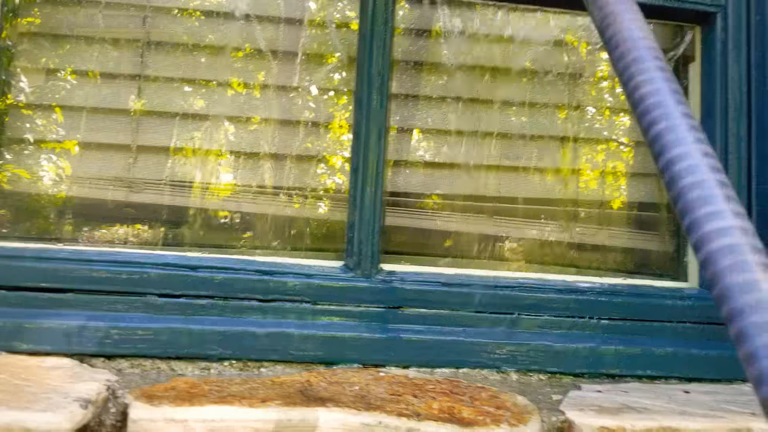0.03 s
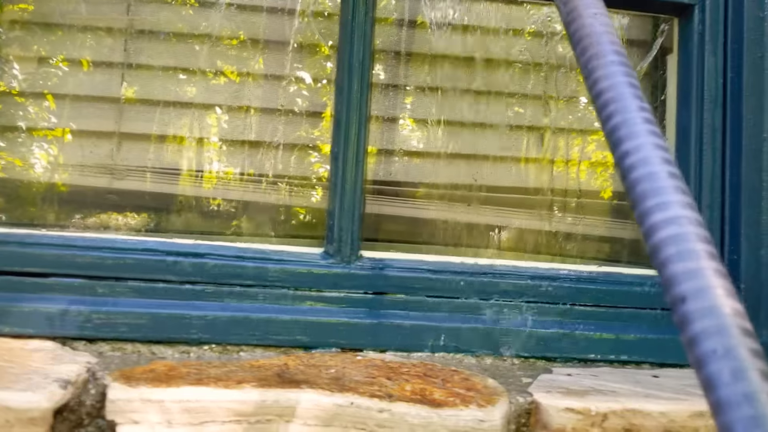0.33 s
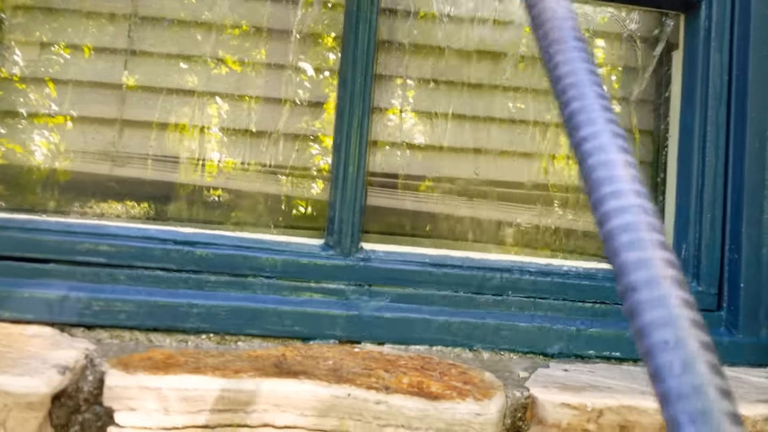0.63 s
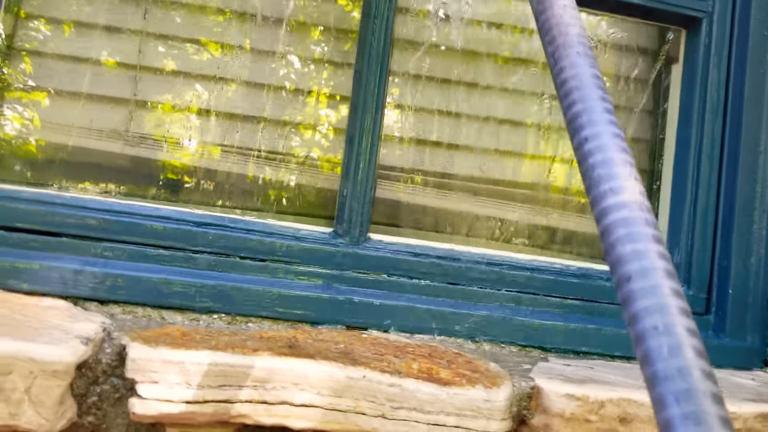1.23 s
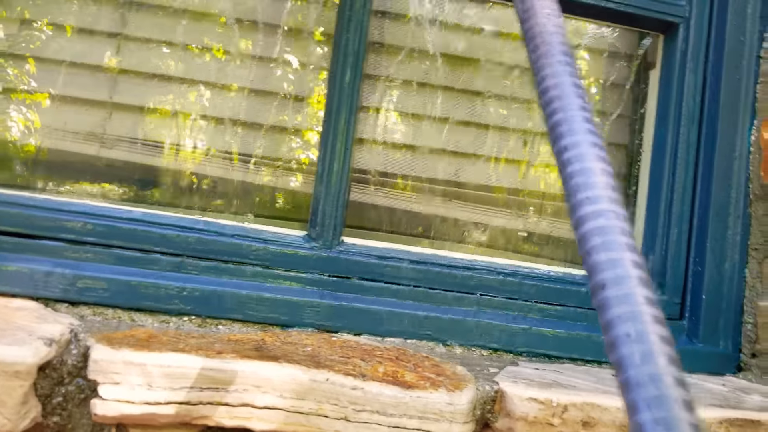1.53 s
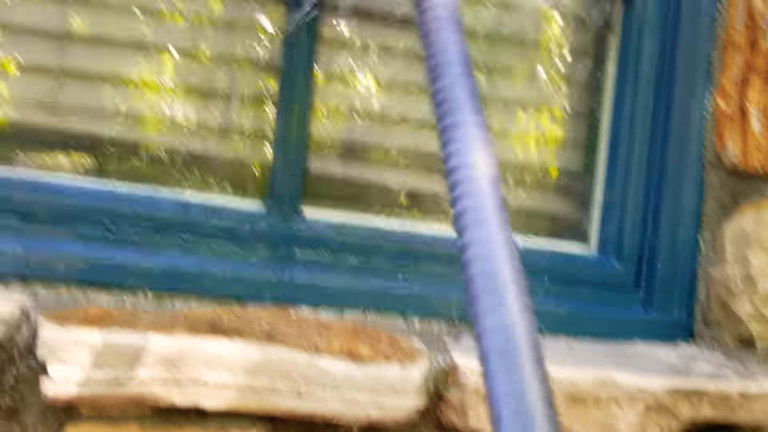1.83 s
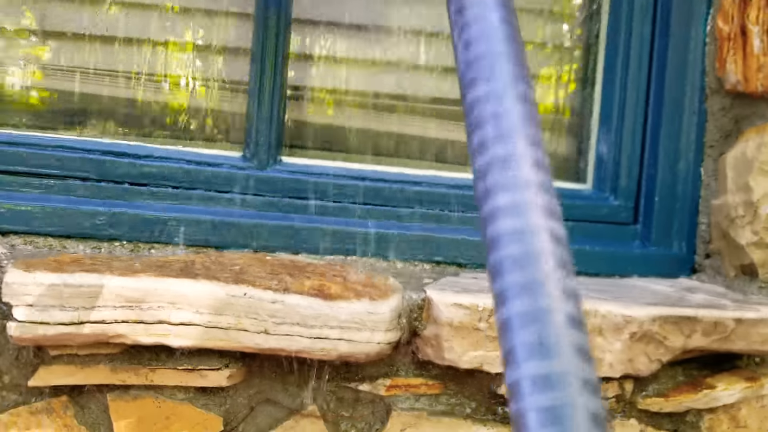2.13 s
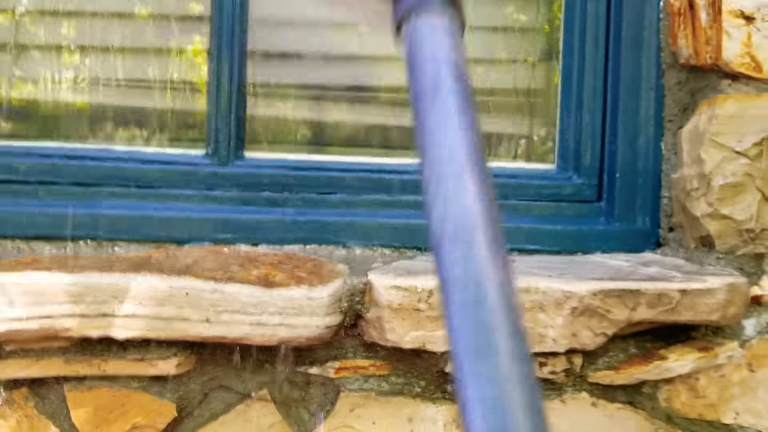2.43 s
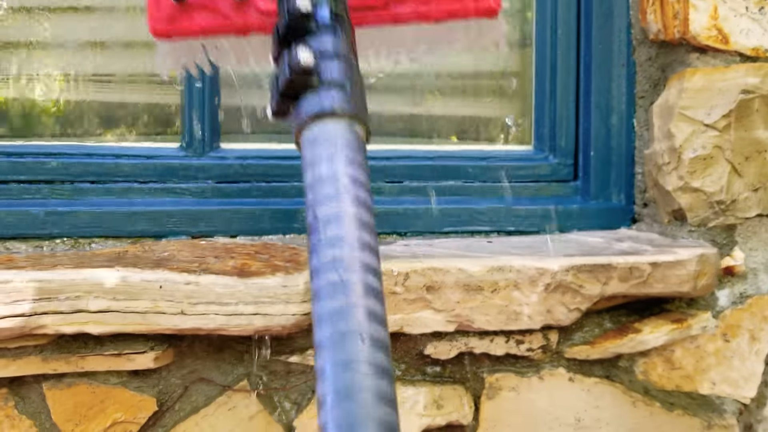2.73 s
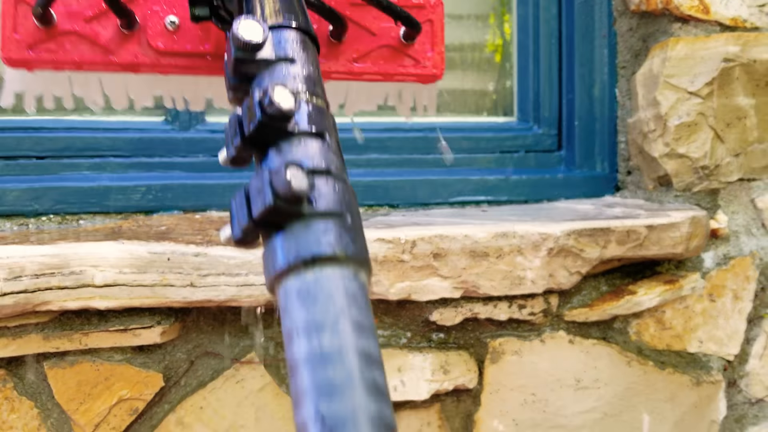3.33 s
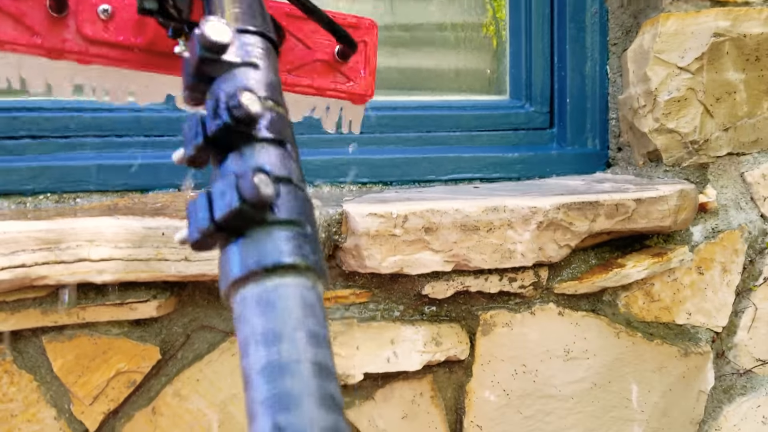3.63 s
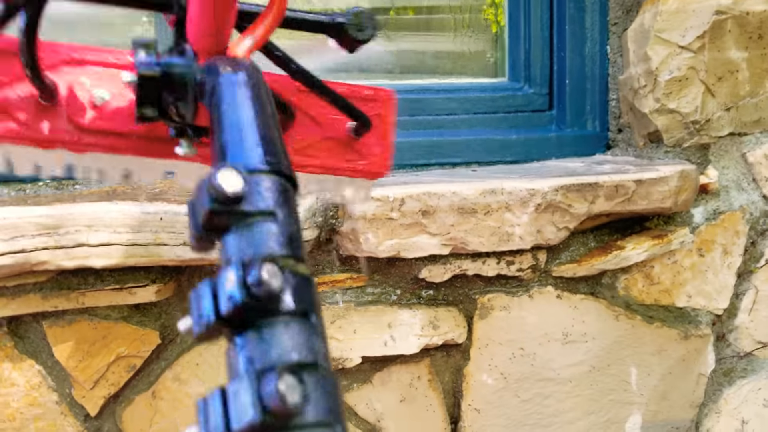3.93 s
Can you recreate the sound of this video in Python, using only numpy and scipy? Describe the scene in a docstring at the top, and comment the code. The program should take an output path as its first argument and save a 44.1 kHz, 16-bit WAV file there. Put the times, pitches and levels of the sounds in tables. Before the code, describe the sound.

Fine water spray patters on a window close by, with runoff splashing and stray drops ticking. From about 1.6 seconds wet bristles scrub the glass in short, hissing strokes until the end, the spray softening after 2 seconds. The pole's clamps click sharply near 1.2, 2, 3.3 and 3.5 seconds. Underneath are soft handling thumps, a low outdoor rumble and a distant engine that rises in pitch, loudest around 3 seconds.

```python
"""Outdoors at a window, a water-fed brush on a telescopic pole washes the glass.
Jets of water patter on the pane and make it ring, then wet bristles scrub it in short strokes
while water runs off. The pole's clamps knock, the brush head bumps the frame and stray drops tick,
all with a brief echo from the wall. Underneath lie soft handling thumps, a low rumble
and a distant engine that slows, then picks up speed near the end."""
import sys
import numpy as np
from scipy import signal
from scipy.fft import rfft, irfft
from scipy.io import wavfile

SR = 44100
rng = np.random.default_rng(int(sys.argv[2]) if len(sys.argv) > 2 else 0)


def master(y):
    """Save y as 16-bit WAV."""
    cut = np.clip(np.atleast_2d(y).T, -1, 1)
    pcm = np.round(cut * 32767)  # scale
    wavfile.write(sys.argv[1], SR, pcm.astype(np.int16))


N = 176400
T = np.arange(N) / SR
PER_HZ = np.sqrt(SR / 2)   # lifts white noise of power 1 to power 1 in every hertz


def brush():
    """Bristles flick over wet glass and ring their block; strokes swell and fade with the head's speed."""
    # strokes: start/s, length/s, level/dB, extra hiss/dB, left minus right/dB
    strokes = [(1.63, 0.26, -2, 4.5, -2.5), (1.903, 0.16, -3.5, 2.5, 1), (2.219, .32, 1, 4, -3),
               (2.728, 0.18, -7, 2.5, 0), (3.041, .29, 1, 6.5, -4), (3.327, 0.12, -7, -2, 0),
               (3.54, 0.24, -4.5, 5, 1), (3.685, 0.17, -5, 6.5, -0.5), (3.848, 0.22, -2.5, 5.5, 0.5)]
    # tone of the bristles: f/Hz, left/dB per Hz, right/dB per Hz
    bristle_tone = [(700, -83.5, -95.5), (1390, -81.5, -81.5), (2230, -70.5, -86), (3930, -70.5, -71.0),
                    (6300, -80.5, -74), (7500, -75.5, -75), (8900, -70, -81), (10300, -74.5, -83.5),
                    (11430, -63.5, -76.5), (12600, -65, -84), (14200, -67.5, -82), (15400, -70.5, -78.0)]
    body_power, hiss_power = np.zeros((2, N)), np.zeros((2, N))
    for start, length, db, hiss_db, pan_db in strokes:
        progress = np.clip((T - start) / length, 0, 1)
        speed = np.abs(np.sin(np.pi * progress)) ** 1.52
        body_power += (speed * from_db(db) * pan(pan_db)) ** 2
        hiss_power += (speed * from_db(db + hiss_db) * pan(pan_db)) ** 2
    contacts = grains(per_s=14000, spread_db=1.5)
    block = from_db(-83.5) * PER_HZ * resonate(contacts, hz=3950, width_hz=540)
    flicks = colour(contacts, bristle_tone) + block
    hiss = signal.sosfiltfilt(signal.butter(2, 10000, "high", fs=SR, output="sos"), flicks)
    scrub = (flicks - hiss) * np.sqrt(body_power) + hiss * np.sqrt(hiss_power)
    return scrub * waver(rate_hz=30, spread_db=1.25)   # uneven drag


def jets():
    """Fine, sputtering spray hits the pane and makes it ring."""
    # tone of spray on glass: f/Hz, left/dB per Hz, right/dB per Hz
    spray_tone = [(610, -97.5, -94), (1100, -87.5, -89), (1900, -78, -85.5), (2310, -82.5, -89),
                  (3860, -80, -79.5), (4960, -88.0, -82), (6600, -83, -81.5), (7630, -79.5, -80.5),
                  (9300, -82, -85.5), (11440, -73.0, -80.5), (12800, -77, -79.5), (15200, -75.5, -79.5)]
    # strength of the spray: t/s, level/dB
    spray_level = [(0, -3), (.7, -2), (1.25, 0), (1.65, -1), (2.05, -1), (2.17, -6.5), (2.55, -5),
                   (2.66, -11.5), (3.0, -6.5), (3.5, -5), (4, -4)]
    # notes the pane rings at: f/Hz, width/Hz, level/dB per Hz
    pane_notes = [(1142, 100, -78), (2000, 320, -80), (3980, 180, -82.5), (7970, 380, -83),
                  (11300, 600, -81)]
    drops_per_s, spread_db = 9000, 3
    spray_db, = in_time(spray_level)
    impacts = grains(drops_per_s, spread_db) * PER_HZ
    pane = sum(from_db(db) * resonate(impacts, hz, width_hz) for hz, width_hz, db in pane_notes)
    patter = colour(grains(drops_per_s, spread_db), spray_tone)
    return (patter + pane * pan(db=4)) * from_db(spray_db) * waver(rate_hz=21, spread_db=0.97)


def runoff():
    """Water runs off the frame and sill in coarser splashes."""
    # tone of the splashes: f/Hz, left/dB per Hz, right/dB per Hz
    splash_tone = [(200, -100, -100), (600, -93.5, -86), (1100, -84.5, -83), (1600, -79, -84),
                   (2540, -79, -83), (3480, -82, -83), (5200, -90.5, -86.5), (8000, -91, -90.5),
                   (15000, -85, -104)]
    # strength of the flow: t/s, level/dB
    flow_level = [(0, 0.5), (1.5, -3), (2.0, -0.5), (2.35, 6.5), (2.55, 2), (2.72, 3.5), (3.0, 0.5),
                  (3.3, 2), (4, -2.5)]
    flow_db, = in_time(flow_level)
    return colour(grains(per_s=3500, spread_db=2), splash_tone) * from_db(flow_db)


def knocks():
    """A crack, a rattle and a rebound ring the clamps; where the pole is hit sets which notes stand out."""
    # knocks: t/s, level/dB, centre of the strongest notes/Hz, their spread/octaves, left minus right/dB
    hits = [(.9595, -27, 4000, .8, -3), (1.2238, -10.5, 2930, 0.55, 1.5), (1.963, -15, 2200, 0.84, 2),
            (2.2435, -20.5, 7000, .9, 3), (3.2728, -12, 8570, 0.72, 2), (3.4724, -7, 7500, 2.25, 2)]
    # notes the clamps ring at: f/Hz, width/Hz, level/dB
    clamp_notes = [(2410, 500, -2.5), (3570, 680, -0.5), (4350, 320, 2.5), (4680, 250, 4), (5224, 270, 4),
                   (7500, 500, 0), (9600, 550, -3.5), (12400, 500, 4), (14530, 800, -6)]
    crack_s, rebound_delay_s, crack_db, ring_db = 0.0011, 0.003, -8.5, 5.5
    out, length = np.zeros((2, N)), SR // 10
    for s, db, centre_hz, octaves, pan_db in hits:
        crack = burst(length, crack_s)
        rattle = from_db(-15.5) * burst(length, decay_s=0.0087)
        rebound = from_db(-6.5) * np.roll(burst(length, crack_s), int(rebound_delay_s * SR), axis=1)
        contact = crack + rattle + rebound
        knock = from_db(crack_db) * contact
        for k, (hz, width_hz, note_db) in enumerate(clamp_notes):
            weight = np.exp(-.5 * (np.log2(hz / centre_hz) / octaves) ** 2)
            knock += (-1) ** k * weight * from_db(ring_db + note_db) * resonate(contact, hz, width_hz)
        add(out, s, knock * from_db(db) * pan(pan_db))
    return signal.sosfilt(signal.butter(2, 1700, "high", fs=SR, output="sos"), out)


def ticks():
    """Single drops and snapping bristles ping briefly, with a little spatter after them."""
    # pings: t/s, level/dB, f/Hz, time to fade by 60 dB/s, left minus right/dB
    pings = [(0.257, -14.5, 14500, .0012, 3), (.258, -20, 9800, 0.0018, -2), (0.696, -23, 15000, .002, -1),
             (1.18, -21, 12000, .002, 6), (1.204, -21.5, 6700, 0.0017, -5),
             (1.3145, -24, 11100, 0.0027, 11), (1.538, -26, 9600, .003, 4), (2.0655, -25, 9250, .005, 10),
             (2.1015, -28, 9000, .005, 7), (2.112, -30, 5800, .002, -5), (2.118, -22, 12000, .001, 2),
             (2.725, -26, 13100, .002, 5), (2.9319, -29, 13300, .003, 7), (2.983, -26.5, 12500, .003, 14),
             (3.14, -13.5, 13500, .003, 14), (3.412, -26, 13000, .002, 11)]
    out, length = np.zeros((2, N)), SR // 20
    for s, db, hz, fade_s, pan_db in pings:
        spatter = from_db(-15) * burst(length, decay_s=.003)
        ping = ring(click(0)[:length] + spatter, hz, fade_s)
        add(out, s, ping / np.abs(ping).max() * from_db(db) * pan(pan_db))
    return out


def plop():
    """One fat drop lands on the sill."""
    # notes of the plop: f/Hz, level/dB, time to fade by 60 dB/s
    notes = [(565, 1, 0.022), (700, 3, 0.012), (885, -3.5, 0.017)]
    drop = from_db(-25.5) * click(s=2.0862)
    return sum((-1) ** k * from_db(db) * ring(drop, hz, fade_s) for k, (hz, db, fade_s) in enumerate(notes))


def bumps():
    """The padded brush head nudges the frame with a dull scuff."""
    # nudges: t/s, level/dB, top of the sound's range/Hz, decay time/s
    nudges = [(.385, -46, 1300, 0.023), (1.586, -45.5, 1600, 0.0052), (1.733, -41, 1200, .008),
              (1.747, -43, 1500, 0.0073), (2.208, -39, 1100, 0.0094), (2.389, -42.5, 1000, 0.009)]
    out = np.zeros((2, N))
    for s, db, edge_hz, decay_s in nudges:
        band = signal.butter(2, [200, edge_hz], "band", fs=SR, output="sos")
        scuff = signal.sosfilt(band, burst(SR // 5, decay_s)[:1])   # the same on both sides
        add(out, s, scuff * PER_HZ / np.sqrt(edge_hz) * from_db(db))
    return out


def thumps():
    """Handling makes soft thumps, each a low note that dies quickly."""
    # jolts: t/s, level/dB, f/Hz
    jolts = [(.394, -25.5, 92.5), (.472, -34, 139.2), (.897, -30, 58), (1.779, -29, 45), (3.32, -32.5, 173),
             (3.853, -26, 69.9)]
    return sum(from_db(db) * ring(click(s), hz, fade_s=0.092) for s, db, hz in jolts)


def engine():
    """A distant engine hums at the rate it fires, slowing and then speeding up."""
    # the engine's run: t/s, firing rate/Hz, level/dB
    run = [(1.35, 76.1, -60), (1.5, 65.9, -43), (1.62, 57.8, -44), (1.8, 60.1, -40), (1.95, 58.1, -49.5),
           (2.5, 62, -58), (2.65, 68.1, -40.5), (2.8, 72.54, -39.5), (2.94, 79.8, -32), (3.06, 85, -28),
           (3.2, 90.45, -35.5), (3.33, 94.7, -38), (3.6, 101.5, -42.5), (4, 104.6, -48.5)]
    hz, db = in_time(run)
    hum = np.sqrt(2) * np.sin(2 * np.pi * np.cumsum(hz) / SR)
    return hum * from_db(db) * waver(rate_hz=6.4, spread_db=1) * pan(db=-3)


def rumble():
    """Low outdoor noise, much alike in both ears, gently rises and falls."""
    # tone of the rumble: f/Hz, left/dB per Hz, right/dB per Hz
    rumble_tone = [(20, -81, -77), (40.7, -72.5, -62), (69, -56.5, -56.5), (85, -63.5, -64.5),
                   (109, -72, -66.5), (164, -76, -74), (219, -75, -72.5), (277, -78.5, -79),
                   (296, -76.5, -74), (416, -85, -85), (699, -82.5, -83), (1100, -88.5, -88),
                   (1980, -92, -91.5), (5000, -110, -110)]
    # strength of the rumble: t/s, level/dB
    rumble_level = [(0, -1), (1.2, -0.5), (1.6, -0.5), (2.1, 0.5), (2.5, -0.5), (3.0, 0), (3.4, 3),
                    (4, -1.5)]
    db, = in_time(rumble_level)
    shared = 0.86   # share of the power common to both sides
    air = np.sqrt(shared) * rng.standard_normal(N) + np.sqrt(1 - shared) * rng.standard_normal((2, N))
    return colour(air, rumble_tone) * from_db(db)


def wall(x):
    """The stone wall and window recess scatter a sound, adding a brief echo to it."""
    length, fade_s, delay_s, echo_db = SR // 4, 0.16, 0.004, -8.5
    echo = burst(length, fade_s / np.log(1000)) * (T[:length] > delay_s)
    echo = unit_power(echo) / np.sqrt(length)
    return x + from_db(echo_db) * signal.fftconvolve(x, echo, axes=1)[:, :N]


def from_db(db):
    """Turn decibels into a number to multiply by."""
    return 10 ** (np.asarray(db) / 20)


def unit_power(x):
    """Scale a sound so its average power is 1."""
    return x / np.sqrt(np.mean(x ** 2) + 1e-20)


def in_time(rows):
    """Join a table's timed points with straight lines, one curve for each value column."""
    s, *columns = np.transpose(rows)
    return [np.interp(T, s, column) for column in columns]


def pan(db):
    """Left and right gains that make the left side louder by db."""
    return from_db(np.array([[db], [-db]]) / 2)


def waver(rate_hz, spread_db):
    """A gain that wanders up and down at random."""
    step, warm_up = 40, 2000   # samples per step, steps thrown away
    r = np.exp(-2 * np.pi * rate_hz * step / SR)
    noise = rng.standard_normal(N // step + warm_up + 2)
    slow = unit_power(signal.lfilter([1], [1, -2 * r, r * r], noise)[warm_up:])
    return from_db(spread_db * np.interp(np.arange(N) / step, np.arange(len(slow)), slow))


def colour(x, tone):
    """Give white stereo noise a left and a right tone from a table."""
    hz, *sides = np.transpose(tone)
    log_f = np.log(np.fft.rfftfreq(N, 1 / SR) + 1)
    gains = from_db([np.interp(log_f, np.log(hz), side) for side in sides])
    return irfft(rfft(x) * gains, N) * PER_HZ


def grains(per_s, spread_db):
    """Tiny random impacts, many weak and a few strong, different on each side."""
    sizes = from_db(spread_db * np.minimum(rng.exponential(1, (2, N)), 6))
    signs = rng.choice([-1, 1], (2, N))
    lands = rng.random((2, N)) < per_s / SR
    return unit_power(sizes * signs * lands)


def resonate(x, hz, width_hz):
    """Let through a band around one note, with gain 1 at its peak."""
    r, w = np.exp(-np.pi * width_hz / SR), 2 * np.pi * hz / SR
    return signal.lfilter(np.array([1, 0, -1]) * (1 - r * r) / 2, [1, -2 * r * np.cos(w), r * r], x)


def ring(x, hz, fade_s):
    """Each click in x starts a pure note that fades by 60 dB in fade_s."""
    r, w = from_db(-60 / (fade_s * SR)), 2 * np.pi * hz / SR
    return signal.lfilter([0, np.sin(w)], [1, -2 * r * np.cos(w), r * r], x + 1e-18)


def click(s):
    """One click of height 1 at s seconds."""
    return (np.arange(N) == int(s * SR)) * 1.


def burst(length, decay_s):
    """A puff of stereo noise that dies away."""
    return rng.standard_normal((2, length)) * np.exp(-T[:length] / decay_s)


def add(out, s, x):
    """Mix a short sound in at s seconds."""
    i = int(s * SR)
    out[:, i:i + x.shape[-1]] += x[:, :N - i]


def scene():
    """Scrubbing and water over the low sounds, plus the taps that echo off the wall."""
    washing = brush() + jets() + runoff()
    lows = rumble() + engine() + thumps()
    return washing + lows + wall(knocks() + ticks() + plop() + bumps())


def record(dry):
    """Cut off the very highest treble steeply."""
    cutoff_hz = 15720
    return signal.sosfilt(signal.ellip(12, .1, 80, cutoff_hz, fs=SR, output="sos"), dry)


dry = scene()
out = record(dry)
master(out)
```